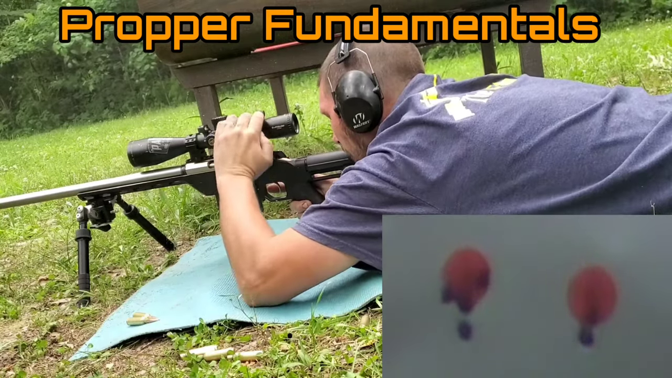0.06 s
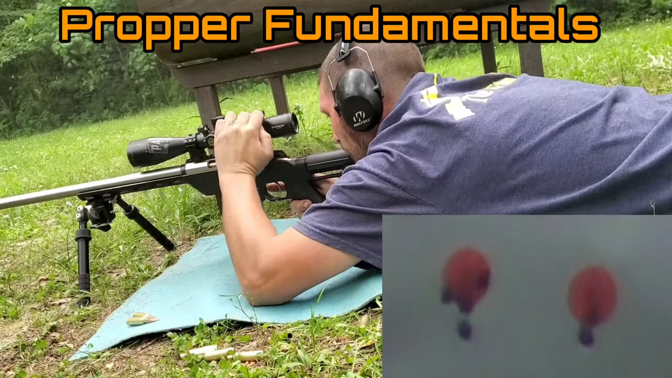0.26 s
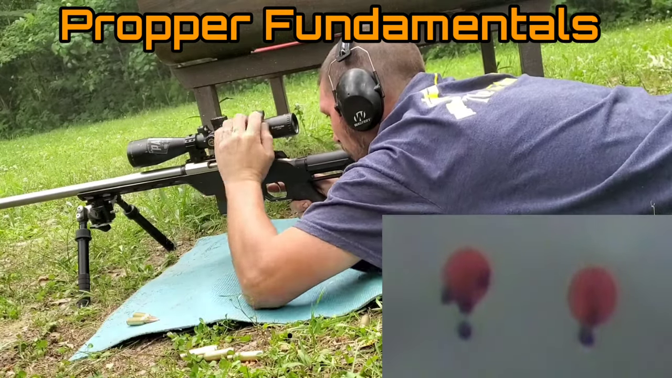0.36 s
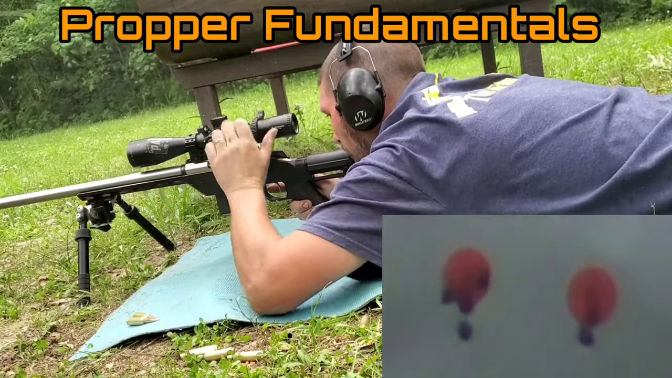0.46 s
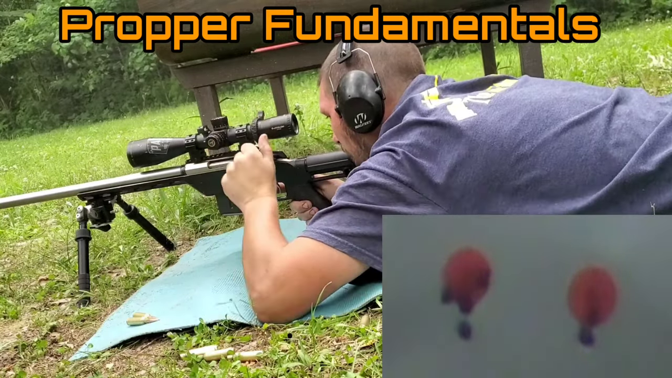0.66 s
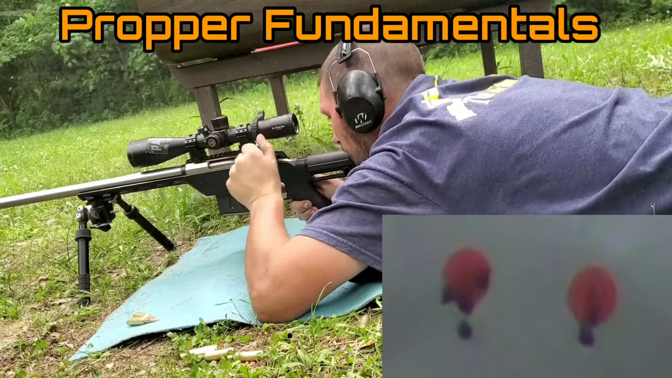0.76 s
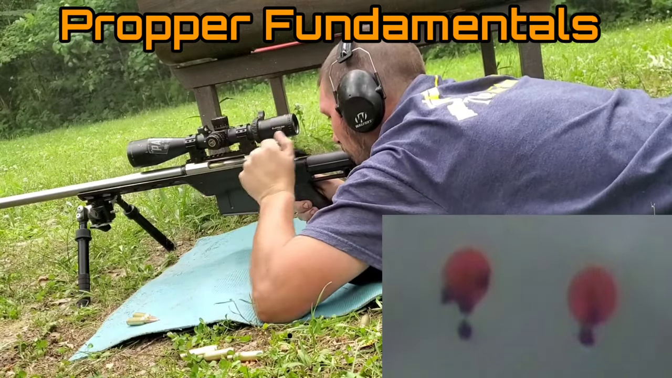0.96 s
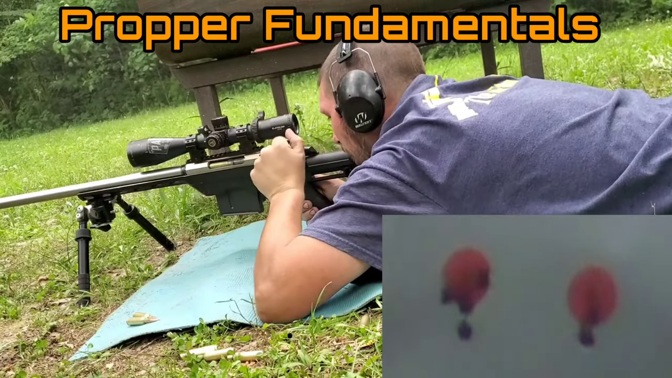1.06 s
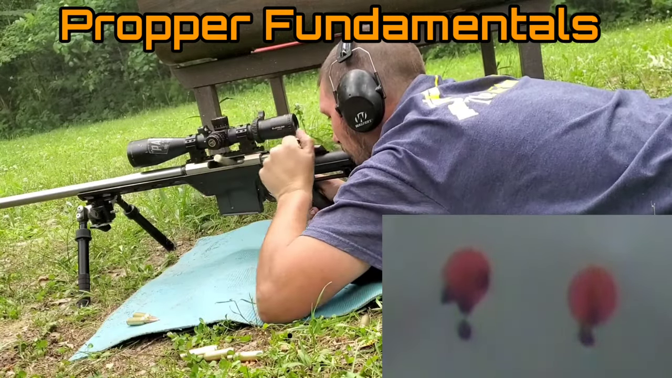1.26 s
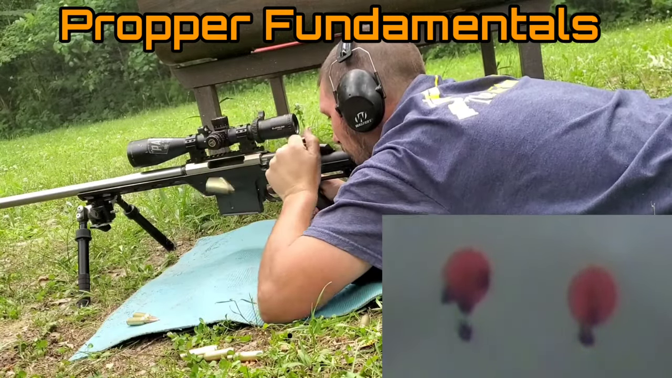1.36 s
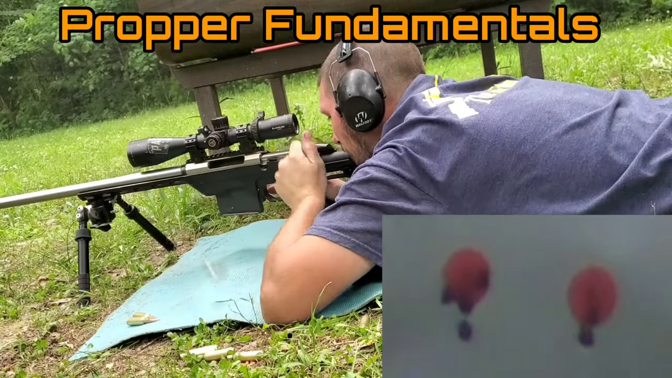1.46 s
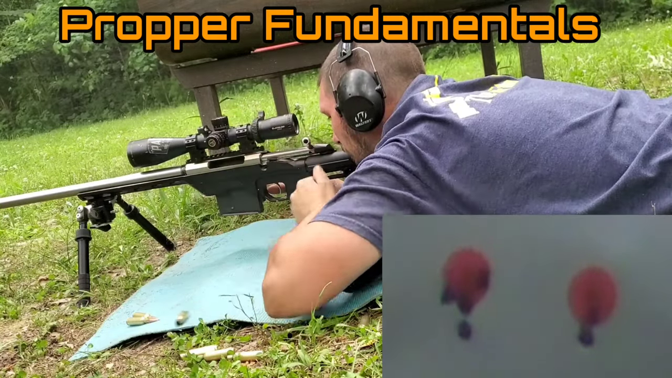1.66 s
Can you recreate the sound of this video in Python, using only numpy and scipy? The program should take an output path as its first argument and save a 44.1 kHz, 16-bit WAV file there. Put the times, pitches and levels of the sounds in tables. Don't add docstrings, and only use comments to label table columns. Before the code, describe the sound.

A rifle bolt is worked close by, slightly left in stereo: a sharp double clack, a pause, a metallic slide back, a brass case ringing out, a hard snap and soft wooden knock, over steady crickets outdoors.

```python
import sys
import numpy as np
from scipy import signal
from scipy.fft import rfft, irfft, next_fast_len
from scipy.io import wavfile
from scipy.ndimage import uniform_filter1d, map_coordinates

SR = 44100
rng = np.random.default_rng(int(sys.argv[2]) if len(sys.argv) > 2 else 0)


def store_pcm(level_fs):
    pcm = np.round(np.clip(level_fs, -1, 1) * 32767).astype(np.int16)
    wavfile.write(sys.argv[1], SR, np.atleast_2d(pcm).T)


def ratio_of_db(decibels):
    return 10 ** (np.asarray(decibels, float) / 20)


N = 74970

# f/Hz, density/dB per Hz
TOUCH_TONE = [(300, 6), (2000, 3.5), (7000, 5), (9500, -25), (15000, -10.5)]
TIP_TONE = [(300, -10), (2070, -9), (2740, 10), (7500, -11), (9500, -11.5), (15000, -14)]


def unit(x):
    return x / np.sqrt(np.mean(x ** 2) + 1e-20)


def along(points, hz):
    f, v = np.transpose(points)
    return np.interp(np.log(hz + 1), np.log(f + 1), v)


def wobble(rate):
    knots = rng.standard_normal(int(N / SR * 200) + 4)
    return map_coordinates(knots, [np.arange(N) * rate / SR])


def filtered(x, response):
    m = next_fast_len(x.shape[-1] + 8192)
    hz = np.fft.rfftfreq(m, 1 / SR)
    return irfft(rfft(x, m) * response(hz), m)[..., :x.shape[-1]]


def panned(db):
    return ratio_of_db(np.array([[0.5], [-0.5]]) * db)


def rush(spectrum, alike):
    below, above = (spectrum[0][0] * 0.9, -120), (spectrum[-1][0] * 1.15, -120)
    closed = [below] + list(spectrum) + [above]

    def mid_side(hz):
        turn = np.arccos(np.clip(along(alike, hz), -1, 1)) / 2
        return ratio_of_db(along(closed, hz)) * [np.cos(turn), np.sin(turn)]

    mid, side = filtered(rng.standard_normal((2, N)), mid_side)
    return unit(np.array([mid + side, mid - side]))


def yard(x):
    # f/Hz, t60/s
    fading = [(300, 0.26), (3000, 0.23), (8000, 0.28), (14000, 0.2)]
    hz, t, z = signal.stft(rng.standard_normal((2, SR // 3)), SR, nperseg=256)
    decay = ratio_of_db(-60 * t / along(fading, hz)[:, None])
    tail = signal.istft(z * decay, SR, nperseg=256)[1]
    return signal.fftconvolve(x[None], tail / np.linalg.norm(tail[0]), axes=1)[:, :N]


def strikes(contacts, modes, tone, rise_s=0.0004, shadow=0.77, size=15, rough=0.3, width=50):
    # f/Hz, left over right/dB
    shade = [(300, 9), (640, -11), (1400, 16), (2600, 5), (3600, 12), (6800, 5), (9500, 4.5), (14500, 21)]
    out, t = np.zeros((2, N + SR)), np.arange(SR // 4) / SR
    hz, level_db, t60 = np.transpose(modes)[..., None]
    for s, db, scrape_t60, scrape_db in contacts:
        draw = rng.standard_normal((2, 2, len(modes), 1))
        chatter = uniform_filter1d(rng.standard_normal((len(modes), len(t))), size=int(width))
        chatter = 1 + rough * unit(chatter)
        fade = ratio_of_db(level_db + 1.5 * draw[0] - 60 * t / t60)
        ring = (fade * chatter * np.sin(2 * np.pi * hz * t + 1.33 * draw[1])).sum(1)
        a, b = unit(filtered(rng.standard_normal((2, len(t))), lambda f: ratio_of_db(along(tone, f))))
        scrape = np.array([a, 0.2 * a + 0.75 * b]) * ratio_of_db(scrape_db - 60 * t / scrape_t60)
        hit = (ring / 2 + scrape) * (1 - np.exp(-(t / rise_s) ** 2)) * ratio_of_db(db)
        for port in range(2):
            out[port, round(s * SR) + port * size:][:len(t)] += hit[port]
    return filtered(out[:, :N], lambda f: panned(shadow * along(shade, f)))


def air():
    # f/Hz, density/dB per Hz
    rumble = [(12, -53), (20, -12.5), (59, -0.5), (128, -8.5), (150, -11.5), (290, -14.5), (340, -16),
              (407, -16.5), (4500, -27), (5850, -84), (9900, -120)]
    hiss = [(3500, -58), (4600, 7), (6500, 2.5), (9500, -1.5), (12500, -0.5), (14500, -6)]
    # f/Hz, left-right likeness/1
    likeness = [(60, 1), (180, 0.85), (550, 0.22), (1650, -0.22), (4970, 0.49), (15000, 0.65)]
    far = ratio_of_db(-51 + 0.12 * wobble(3.3)) * rush(rumble, likeness)
    return far + ratio_of_db(-64) * rush(hiss, [(5000, 0.26)])


def crickets():
    singers = [
        (40.8, .0145, 5590, -51, -20, -2),
        (39.8, .0005, 5570, -59, -8, 2),
    ]
    # f/Hz, density/dB per Hz
    chorus = [(4900, -26), (5100, -17), (5300, -7), (5500, 0), (5620, -6), (5750, -20), (6000, -27)]
    pulse_s, sag_hz, echo_db = 0.0205, 150, -9.5
    t, out = np.arange(N) / SR, ratio_of_db(-56) * rush(chorus, [(5000, 0.75)])
    for rate, start_s, wing_hz, db, octave_db, pan_db in singers:
        cycle = ((t - start_s) * rate + 0.02 * wobble(5)) % 1
        into = np.clip(cycle / (rate * pulse_s), 0, 1)
        stroke = np.sin(np.pi * into ** 0.6) ** 0.8 * ratio_of_db(0.9 * wobble(30) + wobble(150))
        phase = 2 * np.pi * np.cumsum(wing_hz - sag_hz * into + 20 * wobble(60)) / SR
        octave = unit(stroke ** 1.3 * np.sin(2 * phase))
        song = unit(stroke * np.sin(phase)) + ratio_of_db(octave_db) * octave
        out += ratio_of_db(db - 4.5) * (song * panned(pan_db) + ratio_of_db(echo_db) * yard(song))
    return out


def touches():
    rubs = [
        (.019, -54, 0.014, 10),
        (.953, -46, 0.019, 2.7),
        (.9655, -45, 0.033, 1.7),
        (1.059, -55.5, 0.094, 4.1),
    ]
    rub_modes = [(650, 2, 0.04), (1105, 2, 0.04)]
    return strikes(rubs, rub_modes, TOUCH_TONE, shadow=0.73)


def stock_thuds():
    thuds = [
        (.2285, -40, .02, -22),
        (.2415, -25, .02, -23),
        (1.115, -39, .02, -17),
        (1.143, -37, 0.018, -22),
        (1.344, -41, .02, -20),
        (1.355, -43, .02, -20),
        (1.393, -46, 0.018, -20),
    ]
    body = [(480, -10, .035), (646, 1, 0.06), (1090, -5, 0.045), (1200, -9, .04), (1375, -9, .04)]
    return strikes(thuds, body, TOUCH_TONE, 0.00073, size=5, width=198)


def knock():
    knocks = [
        (1.6243, -40, 0.03, -3),
    ]
    stock = [(118, 7, 0.06), (400, 0, 0.035), (781, -1, 0.03), (1210, 5, 0.03), (1540, 0, 0.028),
             (13500, -10, .02)]
    # f/Hz, density/dB per Hz
    knock_tone = [(100, -6), (300, 0), (1500, -2), (1900, -14), (15000, -22)]
    return strikes(knocks, stock, knock_tone, 0.00031, shadow=0.48, rough=0.061, size=3)


def handle_lift():
    lift = [
        (.2235, -36, .04, -5),
        (.2262, -28, .03, -5),
        (.2274, -12, 0.026, -6),
        (.2305, -26, 0.035, -6),
        (.2345, -33, .03, -3),
    ]
    handle = [(3600, -2, .026), (4790, -7, .018), (5950, -13, .015), (6800, 3, .012), (8420, -6, .022),
              (9520, -12, .02), (12500, -2, .012), (14300, -2, .015)]
    stop = [
        (.2372, -30, .03, -2),
        (.2392, -22, 0.015, -2),
        (.2404, -14.5, 0.022, -5),
        (.2424, -17, 0.025, -5),
        (.2455, -27, .05, 0),
        (.252, -34, .07, 1),
    ]
    lug = [(2930, 0, .024), (2900, -30, .17), (3630, -2, .024), (3830, -6, .028), (5320, -1, .02),
           (6040, -3, .02), (6900, -3, .018), (8110, -9, .02), (11700, -13, .02), (13100, -3, .014),
           (14200, -12, .02)]
    # f/Hz, density/dB per Hz
    lift_tone = [(180, -90), (300, -30), (620, -18), (2300, -12), (3690, -2), (4280, -2), (13600, -5),
                 (15500, 0)]
    return strikes(lift, handle, lift_tone, shadow=0.22) + strikes(stop, lug, lift_tone, shadow=0.74)


def bolt_pull():
    unlock = [
        (1.084, -50, .03, 0.1),
        (1.0875, -29.5, .018, -3),
        (1.0945, -36, .012, -2),
    ]
    cam = [(2730, -1, 0.09), (4920, -1, 0.02), (6200, 1, 0.016), (13900, -7, .012)]
    pull = [
        (1.1025, -41, .015, 4),
        (1.1132, -23, 0.012, 5),
        (1.1155, -25, 0.03, 2),
        (1.1185, -28, .025, 3),
        (1.1205, -30, .03, 2),
        (1.127, -36, 0.04, 0),
        (1.138, -38, .04, -6),
        (1.1443, -28, 0.025, -2),
        (1.148, -37, .03, 0),
    ]
    bolt = [(2100, -26, .05), (2950, -7, .025), (3900, -4, .03), (4554, -4, .03), (5100, -2, .025),
            (5970, -5, .03), (6708, -7, .03), (8150, -7, .035), (9800, -9, .035)]
    spring = [
        (1.0947, -21.5, 0.0092, -17),
    ]
    coil = [(14160, -16, .03), (14420, 0, .048)]
    recoil = [
        (1.1152, -20, 0.02, -8),
        (1.1185, -29, .02, -8),
    ]
    loose_coil = [(13930, -6, .028), (14160, -1, .036), (14290, -6, .028), (14420, -3, .032)]
    # f/Hz, density/dB per Hz
    pull_tone = [(400, -24), (2200, -19), (2800, -8), (5500, 4.5), (10000, -1), (11000, -30), (12200, -4),
                 (15500, 0)]
    return (strikes(unlock, cam, pull_tone)
            + strikes(pull, bolt, pull_tone, shadow=0.56)
            + strikes(spring, coil, pull_tone, shadow=1.2, rough=0.12)
            + strikes(recoil, loose_coil, pull_tone, shadow=0.73))


def ejection():
    eject = [
        (1.3418, -46, .02, 0),
        (1.3437, -24, 0.022, -3),
        (1.3465, -29, 0.018, -3),
    ]
    receiver = [(2735, 0, .045), (3079, -12, .025), (3470, 0, .026), (4037, -8, .022), (5100, -1, .02),
                (7160, -11, .016), (14200, -10, .02)]
    tip = [
        (1.3538, -25.5, 0.02, -2),
        (1.3585, -39, .04, -1),
    ]
    claw = [(2735, -10, .03), (3100, -3, .035), (4040, -2, .025), (4900, -4, .015), (7160, 0, .016)]
    case = [
        (1.344, -30, 0.0092, -23),
        (1.357, -43.5, .01, -20),
    ]
    brass = [(9365, -4, .26), (9400, -11, .2), (14110, -4, .15), (14165, -6, .13)]
    # f/Hz, density/dB per Hz
    eject_tone = [(180, -45), (300, -14), (2070, -15), (2740, 1), (9600, -12), (10300, -30), (13800, -8),
                  (15500, -8)]
    return (strikes(eject, receiver, eject_tone, shadow=1.3)
            + strikes(tip, claw, TIP_TONE, shadow=0.88)
            + strikes(case, brass, eject_tone, 0.0014, shadow=0.4, rough=0.63, width=820))


def snap():
    snaps = [
        (1.385, -36, .02, -30),
        (1.389, -30, .02, -30),
        (1.3922, -4, 0.012, -24),
    ]
    catch_modes = [(2000, -24, .01), (3050, -11, .009), (3540, 0, .0095), (3900, -7, .009)]
    rattle = [
        (1.3935, -34, 0.046, 2),
        (1.3985, -27.5, 0.019, -12),
    ]
    latch = [(3300, -3, .025), (3600, 0, .03), (3900, -3, .025)]
    return (strikes(snaps, catch_modes, TOUCH_TONE, 0.0024, shadow=2.3, rough=0.05)
            + strikes(rattle, latch, TIP_TONE, shadow=0.68))


def scene():
    background = air() + crickets()
    gun = touches() + stock_thuds() + knock() + handle_lift() + bolt_pull() + ejection()
    catch = snap()
    echo = ratio_of_db(-19) * yard(gun[0] + ratio_of_db(-13) * catch[0])
    return background + echo + gun + catch


def top_cut(x):
    return signal.sosfilt(signal.butter(12, 15960, fs=SR, output="sos"), x)


def record(dry):
    top_hz, edge_hz = 14610, 120
    mix = filtered(dry, lambda hz: 1 / (1 + np.exp(np.clip((hz - top_hz) / edge_hz, -50, 50))))
    return top_cut(mix)


dry = scene()
out = record(dry)
store_pcm(out)
```